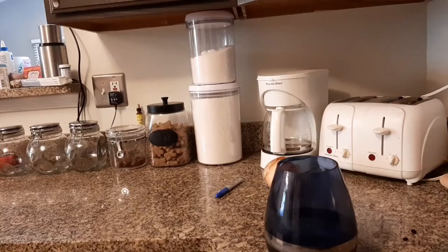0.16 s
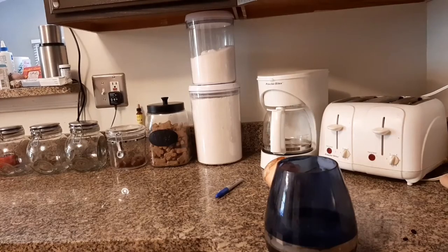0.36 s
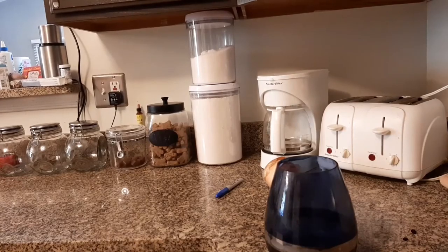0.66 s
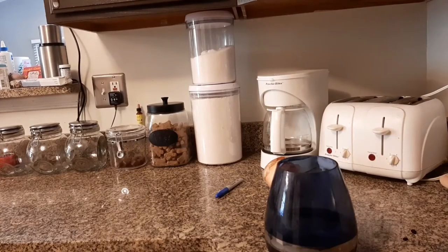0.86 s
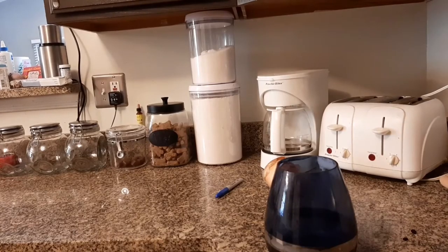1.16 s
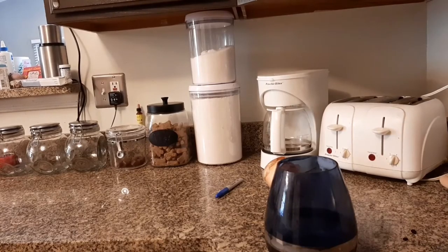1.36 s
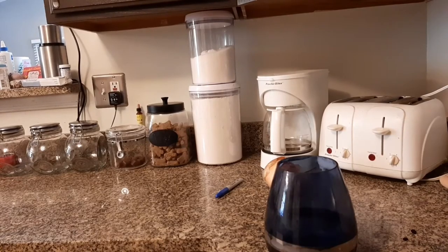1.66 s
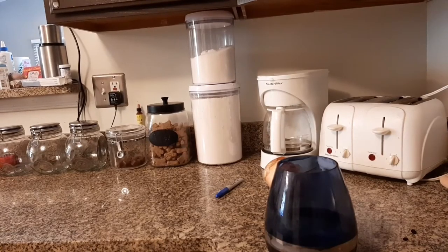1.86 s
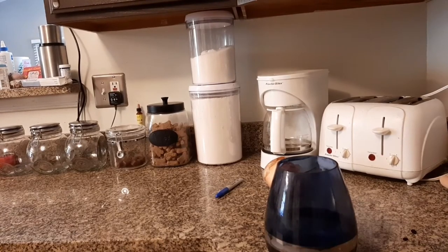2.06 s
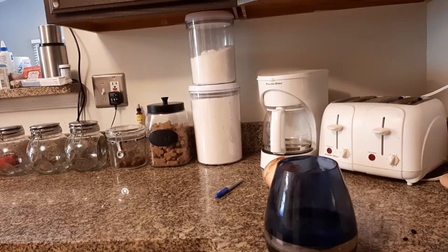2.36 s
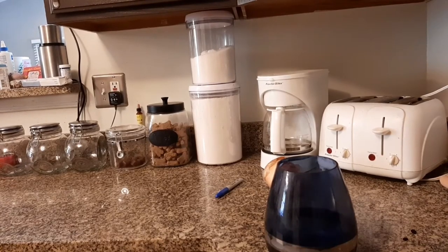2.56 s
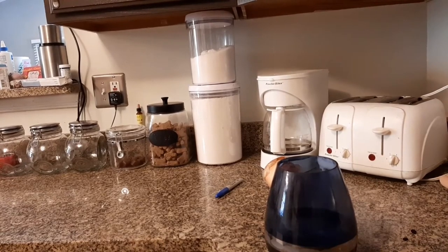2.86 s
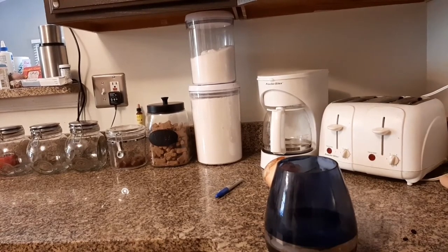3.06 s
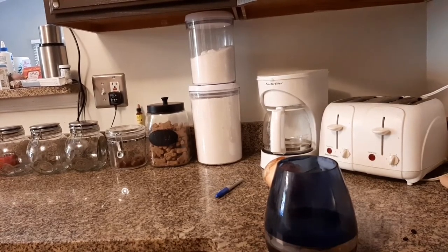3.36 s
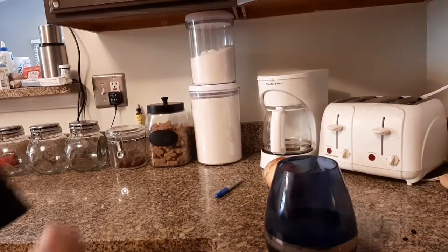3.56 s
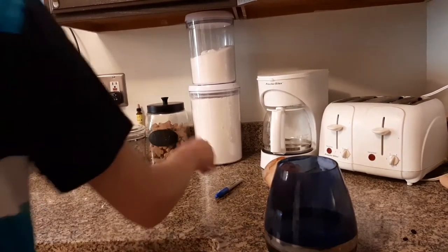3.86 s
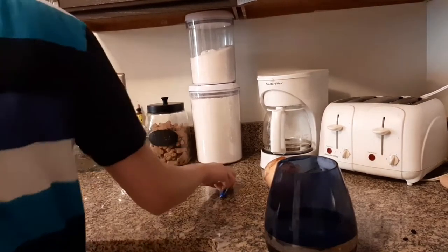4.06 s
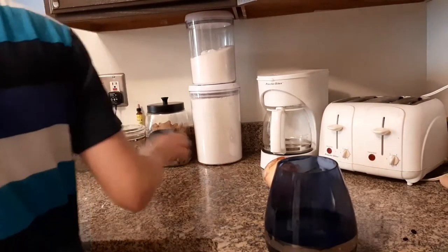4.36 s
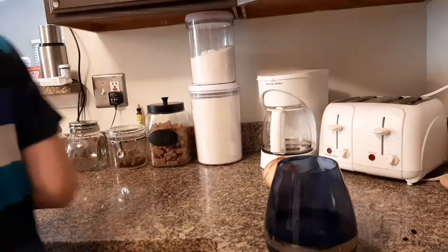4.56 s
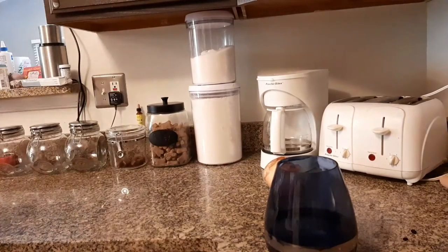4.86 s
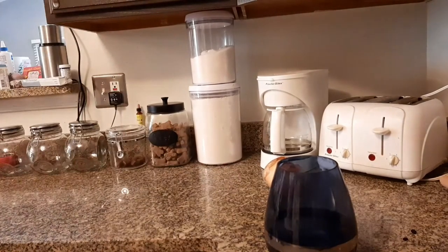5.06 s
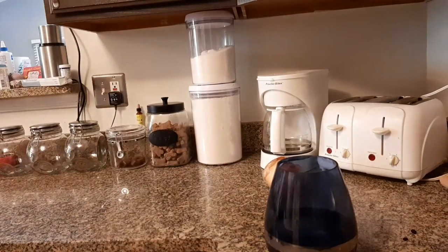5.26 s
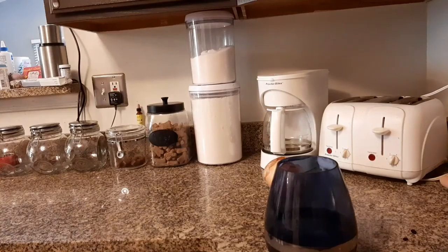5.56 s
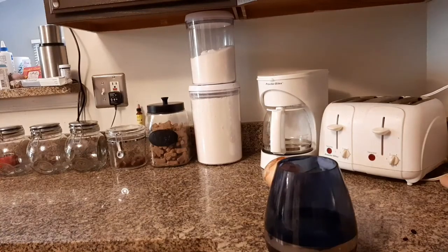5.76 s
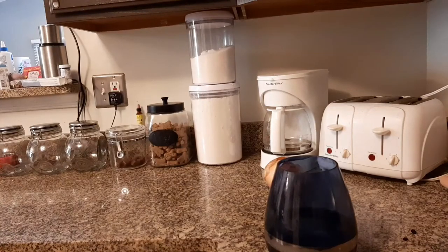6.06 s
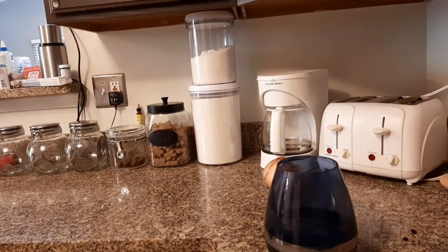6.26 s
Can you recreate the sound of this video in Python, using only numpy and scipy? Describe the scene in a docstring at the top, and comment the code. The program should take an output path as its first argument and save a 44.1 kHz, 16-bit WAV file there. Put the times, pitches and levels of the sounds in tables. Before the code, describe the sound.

Over steady low humming, hollow glass knocks ring brightly around one second, with a sharp lid clap and a short hiss of glass on stone. Then faint cloth movement and a heel thud lead to stronger rustling. Fingers fumble a pen off the counter with a quick scrape and a cluster of dry knocks, and the clothes swish off. Small reflective kitchen, device resting on the counter, near and detailed.

```python
"""In a small hard kitchen a glass jar slides and is set down on stone: it clinks, its lid claps on, it rocks on a second jar.
Someone then steps up in rustling clothes, fumbles a plastic pen off the counter and walks away.
Knocks are short bursts of coloured noise, ringing glass is a set of fading tones, and rubbing is noise with a swelling level.
The room answers every knock, over a low appliance hum; a phone with two ports stands on the counter."""
import sys
import numpy as np
from scipy import signal
from scipy.fft import rfft, irfft, next_fast_len
from scipy.io import wavfile
from scipy.ndimage import uniform_filter1d, map_coordinates

SR = 44100
rng = np.random.default_rng(int(sys.argv[2]) if len(sys.argv) > 2 else 0)


def wav_record(signal):
    """Record a signal, one row per channel, as 16-bit PCM in the file named by sys.argv[1]."""
    frames = np.transpose(np.atleast_2d(signal))
    bounded = np.clip(frames, -1, 1)
    # unit amplitude maps onto the largest positive 16-bit level
    quanta = np.round(bounded * 32767).astype(np.int16)
    wavfile.write(sys.argv[1], SR, quanta)


N = 282681  # length of the scene in samples
T = np.arange(SR) / SR  # the life of one contact, one second long [s]

# colour of a jar's knock: (frequency [Hz], level per Hz [dB])
JAR_KNOCK = [(60, -20.5), (200, -23), (400, -11.5), (500, -9.5), (570, 0), (680, -4.5), (950, -17),
             (1700, -19), (2300, -26.5), (3500, -31), (4700, -28.5), (5250, -30), (5900, -32.5),
             (8000, -33), (13000, -34), (16000, -40.5)]


def amp(db):
    """Turn decibels into gain."""
    return 10 ** (np.asarray(db) / 20)


def unit(x):
    """Scale to rms 1."""
    return x / np.sqrt(np.mean(x ** 2) + 1e-20)


def unit_start(x):
    """Scale so that the first 20 ms have rms 1."""
    return x / np.sqrt(np.mean(x[:, :SR // 50] ** 2))


def fade(t60):
    """A decay of 60 dB in t60 seconds."""
    return np.exp(-np.log(1000) * T / t60)


def along(points, hz):
    """Read a curve of (frequency [Hz], value) points on a log frequency axis."""
    point_hz, values = np.transpose(points)
    return np.interp(np.log(hz + 1), np.log(point_hz + 1), values)


def wobble(rate, size):
    """A smooth random curve through `rate` random points in every SR samples."""
    points = rng.standard_normal(int(size * rate / SR) + 4)
    return map_coordinates(points, [np.arange(size) * rate / SR])


def filtered(x, response):
    """Filter x by a response that is a function of frequency."""
    size = x.shape[-1]
    padded = next_fast_len(size + SR // 4)
    spectrum = rfft(x, padded) * response(np.fft.rfftfreq(padded, 1 / SR))
    return irfft(spectrum, padded)[..., :size]


def coloured(x, gain_db, tilt_db):
    """Colour a sound, tilted about 1 kHz, without anything sounding early (minimum phase)."""
    octaves = np.log2(np.maximum(np.fft.rfftfreq(SR, 1 / SR), 100) / 1000)
    cepstrum = irfft(np.log(amp(gain_db + tilt_db * octaves)))
    # folding the second half onto the first gives the minimum phase
    cepstrum[1:SR // 2] *= 2
    cepstrum[SR // 2 + 1:] = 0
    return irfft(rfft(x) * np.exp(rfft(cepstrum)))


def diffuse(size):
    """White noise from all sides: the two ports agree only in the bass."""
    # (frequency [Hz], left-right likeness [1 = same, 0 = unrelated])
    alike = [(60, 0.92), (150, .93), (300, 0.75), (600, 0.49), (1200, 0.02), (4000, 0)]

    def mid_and_side(hz):
        turn = np.arccos(np.clip(along(alike, hz), -1, 1)) / 2
        return np.array([np.cos(turn), np.sin(turn)])

    mid, side = filtered(rng.standard_normal((2, size)), mid_and_side)
    return np.array([mid + side, mid - side])


def rush(spectrum):
    """Steady diffuse noise of rms 1 with the given colour."""
    return unit(filtered(diffuse(N), lambda hz: amp(along(spectrum, hz))))


def add(track, s, sound):
    """Mix a sound into the track at time s."""
    part = track[:, round(s * SR):][:, :sound.shape[1]]
    part += sound[:, :part.shape[1]]


def stroke(s, db, rise, fall):
    """Gain of one rubbing movement: it gathers speed up to time s, then slows to rest."""
    shape = 1.6  # how the stroke dies away from its peak: 1 is pointed, 2 is bell-shaped
    t = np.arange(N) / SR - s
    return amp(db) * np.exp(-np.abs(t / np.where(t < 0, rise, fall)) ** shape)


def strokes(rows):
    """Gain of several movements; where they overlap their powers add."""
    return np.sqrt(sum(stroke(*row) ** 2 for row in rows))


def friction(spectrum, grain_db, flutter_db):
    """Rubbing noise: tiny catches bunched by the uneven stroke, combed by reflections that drift as the contact moves."""
    z = signal.stft(rush(spectrum), nperseg=1024)[2]
    walls = rng.standard_normal((2, z.shape[1], 1))  # the part of the reflections that stays put
    drift = unit(uniform_filter1d(rng.standard_normal(z.shape), 24, axis=2))
    combed = signal.istft(z * amp(3 * walls + 2.5 * drift))[1][:, :N]
    grain = grain_db * wobble(900, N)
    flutter = flutter_db * wobble(35, N)
    return unit(combed * amp(grain + flutter))


def peaks(centres_hz, hz, width):
    """1 at each resonance and 0 far from all; width is a share of the frequency, and low ones are damped more."""
    return np.max([1 / (1 + ((hz - c) / (width * c + 14)) ** 2) for c in centres_hz], axis=0)


def body(spectrum, centres_hz, peak_db, ripple_db):
    """Gain [dB] of a struck body: broad colour, main resonances and a crowd of small ones, new at every contact."""
    hz = np.fft.rfftfreq(SR, 1 / SR)
    crowd = ripple_db * wobble(450, len(hz)) * np.clip(hz / 2500, 0, 1)  # a random point every 98 Hz
    return along(spectrum, hz) + peak_db * peaks(centres_hz, hz, width=0.02) + crowd


def room_tail(damping):
    """The kitchen's answer: each frequency dies at its own speed, faster the higher the damping."""
    # (frequency [Hz], time to fall 60 dB at a damping of 1 [s])
    kitchen = [(100, 0.98), (500, 0.26), (2000, 0.48), (6000, 0.41), (14000, 0.22)]
    hz, t, z = signal.stft(diffuse(SR), SR, nperseg=256)
    decay = np.exp(-np.log(1000) * damping * t / along(kitchen, hz)[:, None])
    tail = signal.istft(z * decay, SR)[1][:, :SR]
    build_up = 1 - np.exp(-T / .006)
    return unit(tail * build_up) / np.sqrt(SR)


def knock(gain_db, tilt_db, length, scatter_db, room_db, damping, pan_db):
    """One contact: the surfaces chatter briefly, nearby things scatter the sound and the room answers."""
    lead = 15  # samples by which the left port hears the direct sound first
    burst = unit(fade(length) * (1 - np.exp(-10 * T / length))) / np.sqrt(SR)
    chatter = burst * rng.standard_normal(SR)
    direct = np.array([chatter, np.roll(chatter, lead)])
    scattered = amp(scatter_db) * burst * diffuse(SR)
    near = coloured(direct + scattered, gain_db, tilt_db)
    far = coloured(room_tail(damping), gain_db, tilt_db)
    both = unit(near) + amp(room_db) * unit(far)
    return unit_start(both * amp([[pan_db / 2], [-pan_db / 2]]))


def ring(modes, favoured_hz, pitch, waver, favour_db):
    """Glass tones swell and fade; the point of contact favours one, and reflections make the high ones waver most."""
    out = np.zeros((2, SR))
    for hz, db, t60, swell, pan_db in modes:
        shape = fade(t60) * (1 - np.exp(-T / swell)) ** 2
        shape = np.sqrt(2) * shape / shape.max()
        favour = favour_db * np.exp(-(np.log2(hz / favoured_hz) * 10) ** 2)
        level = db + favour + rng.normal(0, 1)
        depth = waver * np.sqrt(hz / 1000)
        for port, side in enumerate((1, -1)):
            echoes = 1 + depth * (wobble(80, SR) + 1j * wobble(80, SR))
            echoes = echoes / np.sqrt(1 + 2 * depth ** 2)  # deeper wavering is not louder
            phase = 2 * np.pi * hz * pitch * T + port * rng.uniform(0, np.pi * 2 / 3)
            tone = np.imag(echoes * np.exp(1j * phase))
            out[port] += amp(level + side * pan_db / 2) * shape * tone
    return out


def glass(hits, modes, spectrum, peak_db, ripple_db, length, scatter_db, room_db, pan_db, waver, favour_db):
    """Every blow gives a hollow knock and sets the glass ringing; what it leans on shifts its pitch."""
    out = np.zeros((2, N))
    for s, db, tilt_db, ring_db, favoured_hz, pitch in hits:
        colour = body(spectrum, [mode[0] for mode in modes], peak_db, ripple_db)
        add(out, s, amp(db) * knock(colour, tilt_db, length, scatter_db, room_db, 0.88, pan_db))
        add(out, s, amp(ring_db) * ring(modes, favoured_hz, pitch, waver, favour_db))
    return out


def bumps(rows, spectrum, centres_hz, peak_db, ripple_db, scatter_db, room_db, damping, pan_db):
    """Dead contacts that hardly ring: each is one knock coloured by the body that is struck."""
    out = np.zeros((2, N))
    for s, db, tilt_db, length in rows:
        colour = body(spectrum, centres_hz, peak_db, ripple_db)
        add(out, s, amp(db) * knock(colour, tilt_db, length, scatter_db, room_db, damping, pan_db))
    return out


def background():
    """Low appliance rumble with a droning band, and faint hiss, all made of steady noise."""
    # rumble: (frequency [Hz], level per Hz [dB])
    rumble = [(12, -68.5), (20, -47), (42, -16), (65, -2.5), (117, -6.5), (133, -10.5), (151, -5.5),
              (251, -11), (323, -15), (401, -11), (431, -22.5), (481, -21), (566, -26), (608, -24.5),
              (1500, -46.5), (1950, -71.5), (3300, -120)]
    drone = [(200, -55.0), (245, -4.0), (275, 1.5), (300, -0.5), (350, -58)]
    hiss = [(500, 8.5), (3000, -13), (15000, -11.0)]
    return amp(-51.0) * rush(rumble) + amp(-55.5) * rush(drone) + amp(-68) * rush(hiss)


def slide():
    """A jar's glass base hisses smoothly over the polished stone."""
    # (peak time [s], level [dB], rise [s], fall [s])
    slides = [(0.55, -66, .06, 0.16), (1.25, -45.5, .03, 0.11), (1.458, -42, 0.062, 0.049),
              (1.67, -62, 0.071, 0.054)]
    spectrum = [(500, -21.5), (2500, -6.5), (7000, -1), (12000, 4), (16000, -3.0)]
    return strokes(slides) * friction(spectrum, grain_db=1.5, flutter_db=.6)


def jar():
    """The jar meets the stone: hollow knocks and ringing glass."""
    # (time [s], knock level [dB], brightness [dB per octave], ring level [dB], favoured tone [Hz], pitch ratio)
    hits = [(0.913, -29, -1, -57, 630, 1.5), (0.9165, -21, -0.5, -30.5, 1144, 1.004),
            (1.2105, -20, 0, -34.5, 2070, 1.008), (1.43, -26.5, -0.5, -50.5, 1152, 0.75),
            (1.441, -25, -0.5, -50, 590, .99), (1.447, -29, -1.5, -48.5, 1152, 1.03)]
    # tones: (frequency before the pitch ratio [Hz], level [dB], time to fall 60 dB [s], swell [s],
    # left over right [dB])
    modes = [(585, 1.5, 0.22, 0.086, -0.5), (1155, -2, 0.3, 0.028, 8.5), (1224, -21, 0.2, .02, 11),
             (1420, -21.5, 0.35, .01, -4.5), (1662, 2, 0.093, 0.061, 7.5), (2067, -3.5, 0.26, 0.056, -5),
             (2390, -18.5, .25, 0.0075, 0), (2470, -13, 0.41, 0.009, -5.5), (2750, -20.5, 0.21, .01, 0),
             (2930, -16.5, 0.22, 0.0055, -2), (3310, -28, .35, 0.0057, 5), (4050, -19.5, 0.44, .001, -1),
             (5180, -3.5, 0.19, 0.00091, -3), (5100, -16.5, 0.25, .001, -7.5),
             (6070, -22, 0.22, .001, -6.5), (6600, -22, 0.29, .001, 16.5), (7600, -15, 0.23, .001, -1),
             (10400, -23.5, .2, 0.0012, 1.5), (10600, -22.5, .2, .001, 11), (11800, -25, .17, .001, 0)]
    return glass(hits, modes, JAR_KNOCK, peak_db=6, ripple_db=2.0, length=0.037, scatter_db=1.5,
                 room_db=0.0, pan_db=1.5, waver=0.37, favour_db=8)


def rim_graze():
    """The lid grazes the rim just before it shuts: a faint dead contact."""
    # (time [s], level [dB], brightness [dB per octave], contact length [s])
    grazes = [(1.107, -37.5, -1, .06)]
    rim = [(300, -20.5), (1000, -7.0), (1400, 5), (2200, -10.0), (3500, -2.0), (5500, -20), (15000, -22.0)]
    return bumps(grazes, rim, [1400, 3400], peak_db=0.5, ripple_db=0.5, scatter_db=4,
                 room_db=2.5, damping=0.94, pan_db=-0.5)


def lid():
    """The lid meets the jar: a short clap that rings as it lands."""
    # (time [s], knock level [dB], brightness [dB per octave], ring level [dB], favoured tone [Hz], pitch ratio)
    hits = [(1.1375, -20, 2, -31.5, 6160, 1), (1.1425, -18, 0, -52, 1432, 0.79)]
    # tones: (frequency before the pitch ratio [Hz], level [dB], time to fall 60 dB [s], swell [s],
    # left over right [dB])
    modes = [(793, 4.5, 0.11, 0.0012, 2), (1370, 6, 0.1, 0.0022, 2), (1506, 3, .16, .002, 2),
             (1980, -1, .12, .001, 2), (2380, 4.5, 0.05, .001, 0), (3400, -24, 0.17, .001, 0),
             (4250, -11.5, 0.4, 0.0145, 0), (6100, -6.5, .2, .0005, 0), (6720, -10.5, .12, .0005, 0),
             (8600, -13.5, 0.1, .0005, 0), (10670, 1, 0.11, .0005, -1), (10800, -14, .13, .0005, 0)]
    # colour of the knock: (frequency [Hz], level per Hz [dB])
    spectrum = [(47, -33), (80, -2.5), (581, 0), (649, -0.5), (741, 4.5), (827, -2.5), (1400, -0.5),
                (2430, -10.5), (3700, -24), (4220, -29.5), (6280, -20.5), (7010, -41), (10700, -26),
                (15500, -46.5)]
    return glass(hits, modes, spectrum, peak_db=1.5, ripple_db=6.5, length=0.018, scatter_db=7,
                 room_db=-4.5, pan_db=2.5, waver=0.58, favour_db=1.0)


def counter_knocks():
    """Body, hand and pen knock dully against the counter, whose resonances die at once."""
    # (time [s], level [dB], brightness [dB per octave], contact length [s])
    knocks = [(1.399, -30.5, -1, 0.1), (3.255, -45, -2, 0.04), (3.35, -36.5, -3, 0.082),
              (4.119, -42, -0.5, 0.054), (4.205, -29.5, 1.5, 0.054), (4.221, -26.5, -2.5, 0.037),
              (4.303, -38, -3, 0.061), (4.326, -37.5, -1, 0.044), (4.4058, -22.5, 1, 0.014),
              (4.4125, -22, 0, 0.027), (4.456, -35, 1, 0.0034), (4.48, -26.5, -0.5, 0.036),
              (4.501, -37, 2, 0.025)]
    # colour: (frequency [Hz], level per Hz [dB])
    spectrum = [(35, -45), (60, -19), (123, -5.5), (351, -7), (560, -1.5), (773, -3.5), (849, -8),
                (1320, -12.5), (1480, -25), (1790, -20), (11200, -32), (15500, -47)]
    # dead resonances of the counter and the pen: frequency [Hz]
    resonances = [129, 235, 430, 598, 770, 1170, 1320, 1810, 3250, 4910, 5530, 6620]
    return bumps(knocks, spectrum, resonances, peak_db=6.0, ripple_db=-1.5, scatter_db=6.5,
                 room_db=-2.5, damping=1.27, pan_db=0.5)


def second_jar():
    """The second jar is nudged and rings on freely."""
    # (time [s], knock level [dB], brightness [dB per octave], ring level [dB], favoured tone [Hz], pitch ratio)
    nudges = [(1.454, -32, -4.5, -33, 630, 0.99)]
    # tones: (frequency before the pitch ratio [Hz], level [dB], time to fall 60 dB [s], swell [s],
    # left over right [dB])
    modes = [(630, -4, 0.42, 0.043, 5.5), (871, -2.5, 0.18, 0.0044, -5), (1650, -5.5, 0.72, 0.013, 6.5),
             (2102, -1.5, 0.34, .008, 2), (2890, -18, 0.4, .005, -1), (3710, -11, 0.15, 0.0015, 1.5),
             (5870, -11, 0.094, .001, 3)]
    return glass(nudges, modes, JAR_KNOCK, peak_db=17, ripple_db=19, length=0.031, scatter_db=0,
                 room_db=-5.5, pan_db=7, waver=0.12, favour_db=4)


def clothes():
    """Each movement swishes in the treble and, as the cloth presses, rubs lower down; a faint hollow band swells too."""
    # movements of the body: (peak time [s], swish level [dB], rise [s], fall [s], rub over swish [dB])
    moves = [(2.11, -58, .12, .12, 1), (2.78, -64, 0.36, 0.22, -1.5), (2.998, -46.5, 0.052, 0.1, 1.5),
             (3.36, -41.5, 0.16, 0.18, -0.5), (3.585, -48.5, 0.097, 0.074, 5.5),
             (3.66, -47, 0.14, 0.1, -5.5), (4.17, -56.5, 0.32, 0.34, 10), (4.55, -56, 0.37, 0.3, 4.5),
             (4.75, -50.5, 0.087, 0.11, -14), (5.11, -46.5, 0.32, 0.25, -5), (5.55, -49, 0.28, 0.27, -2),
             (5.77, -59.5, 0.085, 0.075, 7), (6.035, -60, 0.2, 0.079, 8.5)]
    # hollow band: (peak time [s], level [dB], rise [s], fall [s])
    hollows = [(3.5, -55.5, 0.27, 0.26), (5.0, -56, 0.55, 0.24), (5.57, -52.5, 0.3, 0.21)]
    # colour of the swish: (frequency [Hz], level per Hz [dB])
    swish_colour = [(1180, -73), (2000, -42), (2640, -5), (3510, -4), (4510, 1), (9320, 0), (11000, 1),
                    (12700, -1), (15800, -8)]
    # colour of the rub: (frequency [Hz], level per Hz [dB])
    rub_colour = [(300, 3), (500, 1.5), (730, -6.5), (840, -3.5), (980, -8), (1400, -12), (1900, -6.5),
                  (2600, -8.5), (4000, -11.5), (8000, -61)]
    hollow_colour = [(450, -30), (600, -9), (740, -7), (820, 0), (900, -10.5), (1050, -39.5)]
    rub_span = 0.81  # share of a movement's length in which the cloth presses hard enough to rub

    swish = strokes([(s, db, rise, fall) for s, db, rise, fall, rub_db in moves])
    rub = strokes([(s, db + rub_db, rub_span * rise, rub_span * fall) for s, db, rise, fall, rub_db in moves])
    fine = friction(swish_colour, grain_db=2, flutter_db=.5) * amp([[-1], [.8]])  # a little to the right
    coarse = friction(rub_colour, grain_db=1.5, flutter_db=.9)
    waver = unit(amp(3.5 * wobble(20, N)))  # the hollow band comes and goes
    hollow = strokes(hollows) * waver * rush(hollow_colour)
    folds = amp(1.0 * wobble(14, N))  # folds catch and let go within a movement
    return folds * (swish * fine + rub * coarse + hollow)


def scuffs():
    """Clothing scuffs: soft dead contacts, mostly scattered sound."""
    # (time [s], level [dB], brightness [dB per octave], contact length [s])
    rows = [(2.068, -48, -0.5, 0.048), (3.306, -35.5, 0, 0.045), (3.906, -46, 1.5, 0.095),
            (5.905, -49, 2, 0.11)]
    fabric = [(200, -7), (800, 6.0), (1300, -2), (6000, -8), (12000, -10.0), (16000, -24)]
    return bumps(rows, fabric, [830, 1900], peak_db=8.5, ripple_db=4.5, scatter_db=22,
                 room_db=1.5, damping=0.61, pan_db=3.5)


def creak():
    """Something gives a faint, thin creak: noise squeezed into a few resonances."""
    # (peak time [s], level [dB], rise [s], fall [s])
    creaks = [(2.3, -66.5, .025, 0.08)]
    # resonances: frequency [Hz]
    resonances = [1910, 3140, 4130]
    thin = filtered(diffuse(N), lambda hz: peaks(resonances, hz, width=0.025))
    return strokes(creaks) * unit(thin)


def footsteps():
    """Heels knock on the floor, which answers mostly in the bass."""
    # (time [s], level [dB], brightness [dB per octave], contact length [s])
    heels = [(2.74, -37, 2.5, 0.04), (2.762, -36, 1, 0.063), (2.93, -48.5, 3.5, 0.07),
             (5.925, -33, -6.5, 0.039), (5.942, -41, 1, 0.042)]
    # colour: (frequency [Hz], level per Hz [dB])
    floor = [(20, -7), (50, -1), (90, -7), (130, 2.5), (180, -1.5), (260, -17), (500, -22), (2000, -62)]
    return bumps(heels, floor, [52, 82, 175], peak_db=8.0, ripple_db=11.5, scatter_db=-3,
                 room_db=-5.5, damping=0.75, pan_db=2.0)


def drag():
    """The pen's plastic barrel scrapes over the stone as the fingers close on it."""
    # (peak time [s], level [dB], rise [s], fall [s])
    drags = [(4.16, -40, 0.049, .04), (4.206, -32.5, 0.02, 0.04), (4.32, -43, 0.038, 0.043)]
    # colour: (frequency [Hz], level per Hz [dB])
    pen = [(200, -5), (500, -9), (900, 3), (1400, -1.5), (2100, -1), (2700, -15.5), (5000, -15.5),
           (9000, -14.5), (16000, -27)]
    return strokes(drags) * friction(pen, grain_db=2, flutter_db=3.0)


def click():
    """One small, dry click: a short crisp contact."""
    # (time [s], level [dB], brightness [dB per octave], contact length [s])
    clicks = [(5.6355, -39.5, 1.5, 0.023)]
    crisp = [(300, -20), (1000, 5), (3000, 0.5), (6000, 0.5), (12000, -4.5), (16000, -7.5)]
    return bumps(clicks, crisp, [5500], peak_db=2, ripple_db=1.5, scatter_db=-3,
                 room_db=-4, damping=1.1, pan_db=-2)


def scene():
    """Jars, the hand on the counter, clothes and steps in the kitchen."""
    jars = slide() + jar() + rim_graze() + lid() + second_jar()
    person = counter_knocks() + clothes() + scuffs() + footsteps() + drag()
    return background() + jars + person + creak() + click()


def record(dry):
    """The phone sheds the deepest bass and keeps next to nothing above its band limit."""
    bass_hz, top_hz = 42, 15850

    def response(hz):
        bass = (1j * hz) ** 2 / (bass_hz ** 2 + 1j * bass_hz * hz - hz ** 2)
        return bass / (1 + (hz / top_hz) ** 200)

    return filtered(dry, response)


dry = scene()
out = record(dry)
wav_record(out)
```